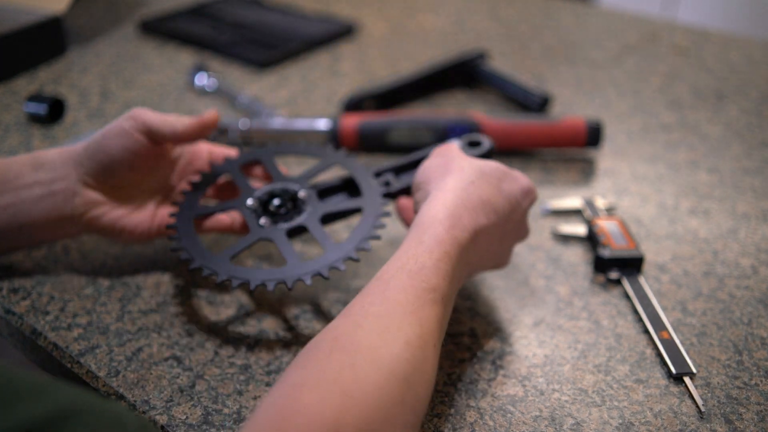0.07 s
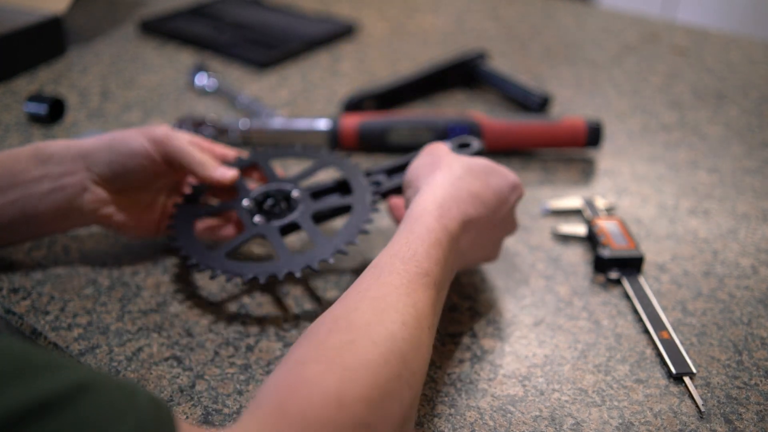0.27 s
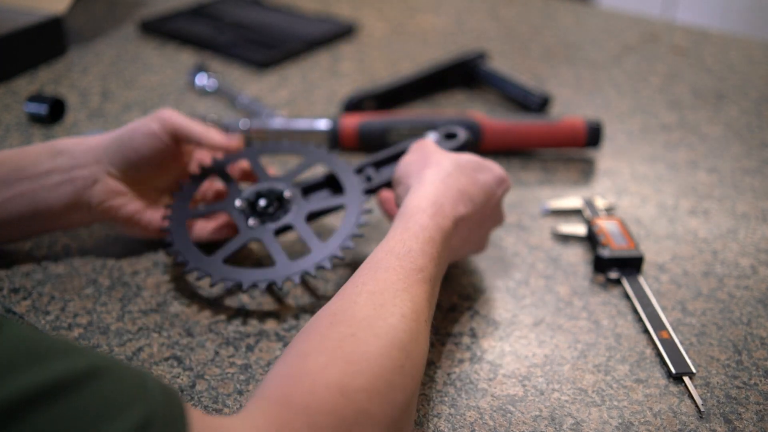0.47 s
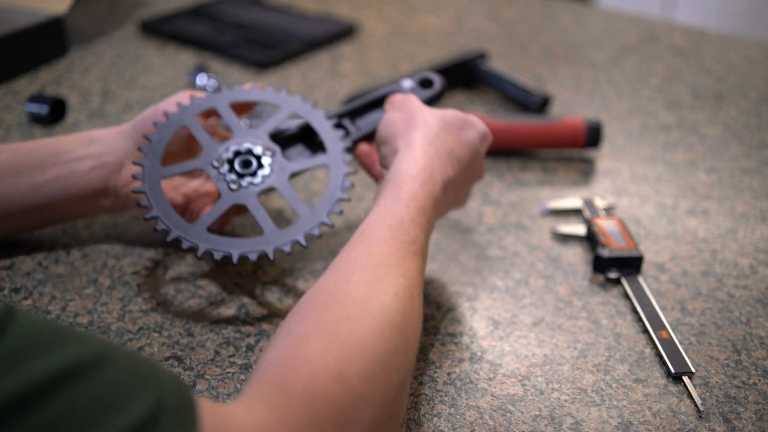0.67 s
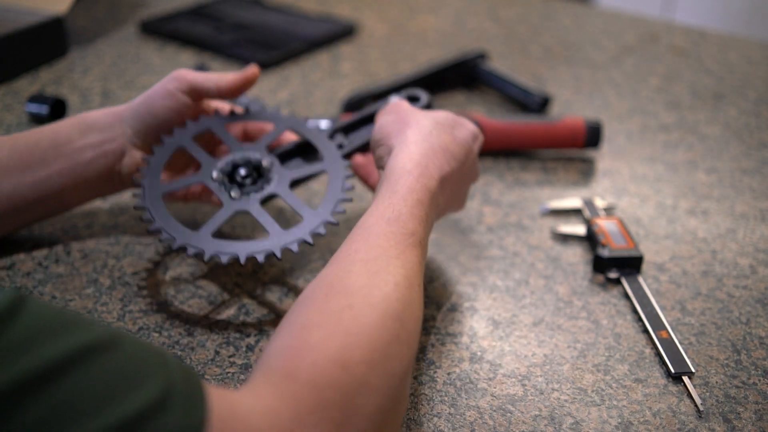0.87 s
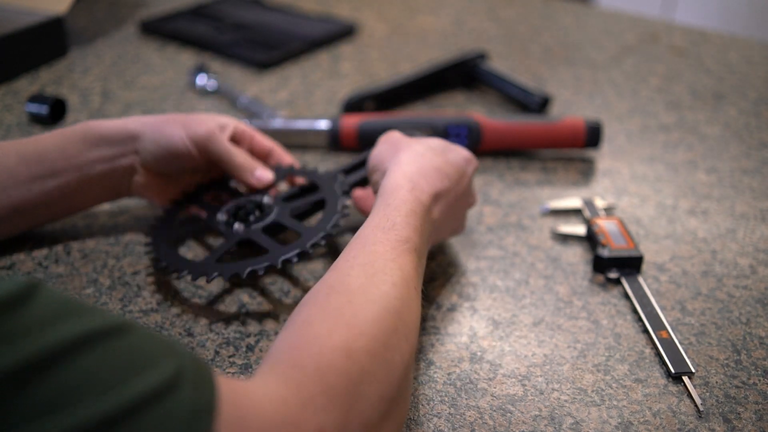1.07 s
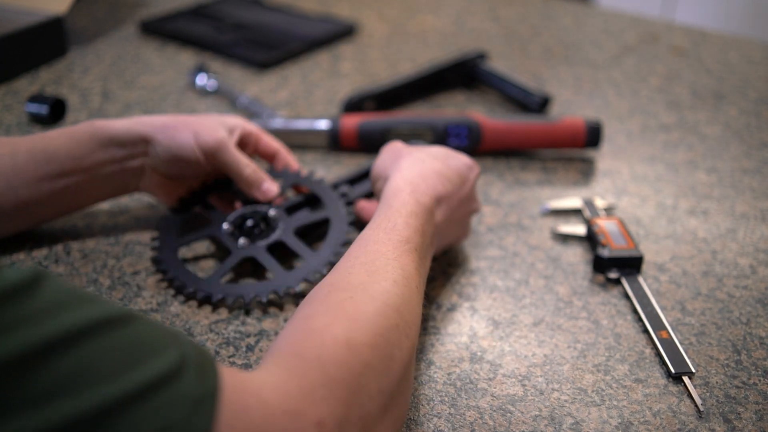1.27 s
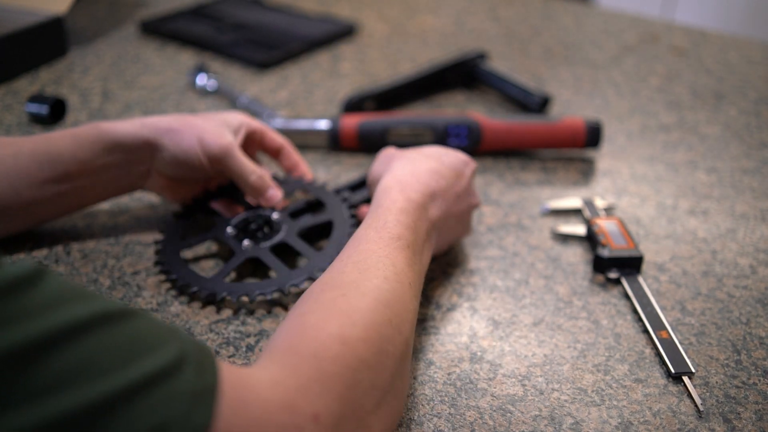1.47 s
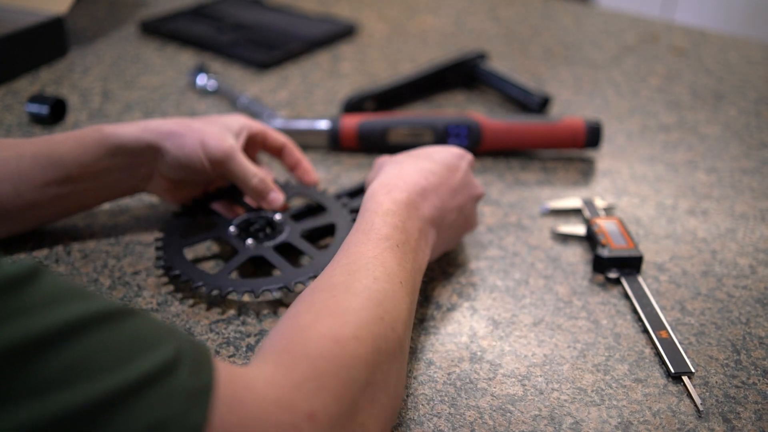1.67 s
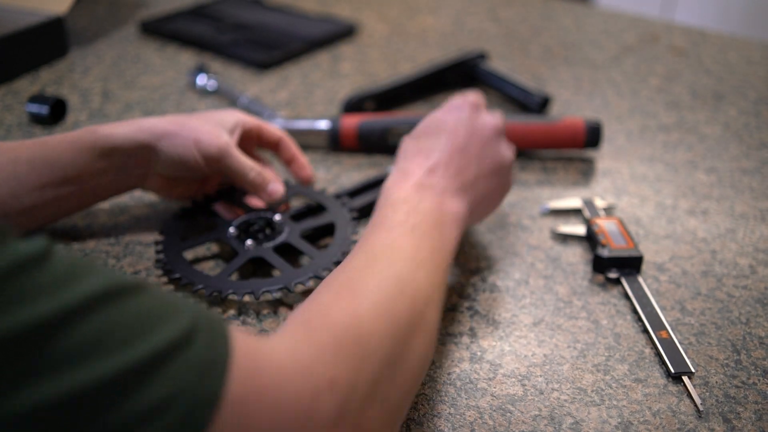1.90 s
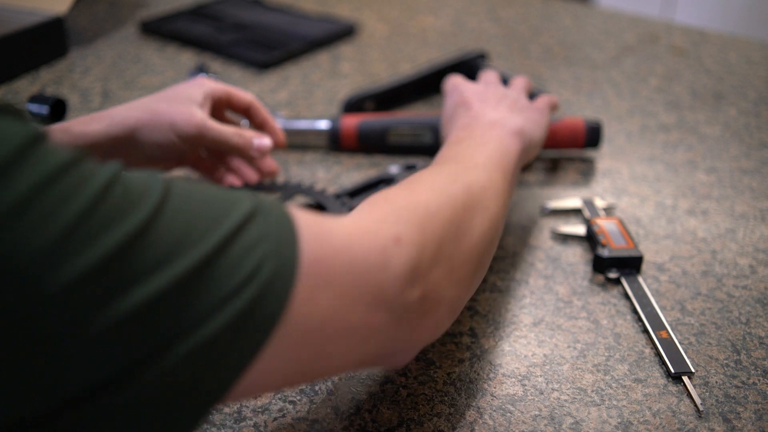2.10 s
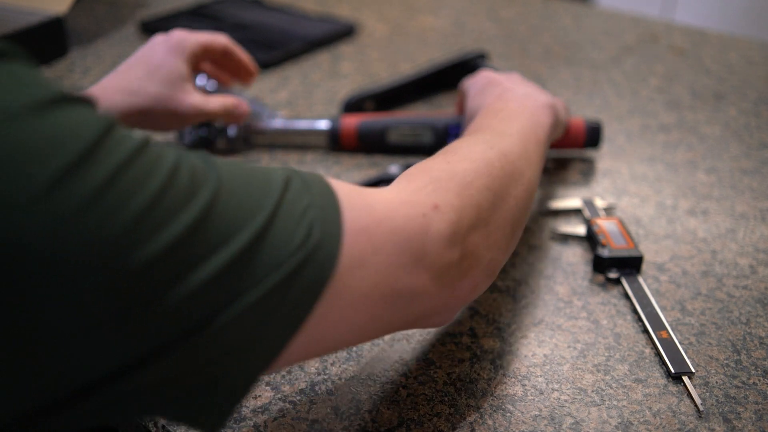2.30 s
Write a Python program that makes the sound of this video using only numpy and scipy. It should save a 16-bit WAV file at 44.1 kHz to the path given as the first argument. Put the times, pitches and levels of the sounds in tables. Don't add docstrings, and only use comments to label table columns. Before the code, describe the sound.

Light metallic ticks of handled bike parts come first, then a ringing clank and a harder double clack as they meet a stone counter, ending in soft rustling; small live room, faint hush, close small recorder.

```python
import sys
import numpy as np
from scipy import signal
from scipy.fft import rfft, irfft
from scipy.io import wavfile
from scipy.ndimage import uniform_filter1d, map_coordinates

SR = 44100
rng = np.random.default_rng(int(sys.argv[2]) if len(sys.argv) > 2 else 0)


def voltage_ratio(decibels):
    exponent = np.asarray(decibels, float) / 20
    return 10 ** exponent


def generate_wav(sig):
    pcm = np.round(np.clip(np.atleast_2d(sig).T, -1, 1) * 32767).astype(np.int16)
    wavfile.write(sys.argv[1], SR, pcm)


N = 103414
LEAD_S = 0.5


def unit(x):
    return x / np.sqrt(np.mean(x ** 2) + 1e-20)


def along(points, hz):
    f, v = np.transpose(points)
    return np.interp(np.log(hz + 1), np.log(f + 1), v)


def colour(gain_db):
    floored_db = np.maximum(gain_db(np.fft.rfftfreq(2048, 1 / SR)), -90)
    cepstrum = irfft(np.log(voltage_ratio(floored_db)))
    cepstrum[1:1024] *= 2
    cepstrum[1025:] = 0
    h = irfft(np.exp(rfft(cepstrum)))[:1024]
    return h / np.linalg.norm(h)


def chatter(lengths_s):
    contacts_per_s, spread_db, longest_fade_s = 7000, 3, 0.0055
    t = np.arange(SR // 8) / SR
    length = lengths_s[:, None]
    shape = (len(lengths_s), len(t))
    hit = rng.random(shape) < contacts_per_s / SR
    hit[:, 0] = True
    size = rng.choice([-1, 1], shape) * voltage_ratio(spread_db * rng.standard_normal(shape))
    fade = np.exp(-np.maximum(t - length, 0) / np.minimum(longest_fade_s, length))
    fade = fade * (1 - 0.27 * np.exp(-t / (0.75 * length)))
    scale = np.sqrt(np.mean(((hit + 0.28) * size) ** 2))
    return (hit + 0.11) * size * fade / scale


def add(track, s, x):
    i = round((s + LEAD_S) * SR)
    track[:, i:i + x.shape[1]] += x


def high_pass(x, hz, order):
    return signal.sosfilt(signal.butter(order, hz, "high", fs=SR, output="sos"), x)


def answer(x, wet_db, spread_db=0):
    # (frequency [Hz], t60 [s])
    room = [(150, 0.69), (350, 0.48), (700, 0.46), (2000, 0.36), (6000, 0.34), (11000, 0.31)]
    delay_s, scatter_t60_s = 0.0027, 0.0014
    hz, t, z = signal.stft(rng.standard_normal((2, SR * 3 // 5)), SR, nperseg=256)
    decay = voltage_ratio(-60 * t / along(room, hz)[:, None])
    tail = signal.istft(z * decay, SR, nperseg=256)[1]
    tail = voltage_ratio(wet_db) * tail / np.linalg.norm(tail[0])
    tail = np.pad(tail, ((0, 0), (round(delay_s * SR), 0)))
    tail[0, 0] = 1
    early = np.arange(SR // 50) / SR
    scatter = rng.standard_normal(len(early)) * voltage_ratio(-60 * early / scatter_t60_s)
    tail[1, :len(scatter)] += voltage_ratio(spread_db) * scatter / np.linalg.norm(scatter)
    return signal.fftconvolve(x[None], tail, axes=1)


def clinks():
    # (time [s], level [dB], chatter [s], brightness [dB per octave], plate ring [dB])
    contacts = [(-.03, -38.5, 0.018, -5.5, 0), (0.152, -56.5, 0.0021, -21, 1.5),
                (0.4034, -36, 0.016, -12.5, 8.5), (.409, -25.5, 0.0075, 5, 0),
                (.422, -23, 0.0082, 4.5, -1.5), (.437, -40, .006, 11, 0), (0.645, -35, 0.0088, -10.5, -8),
                (0.725, -50, 0.0021, -2, -8), (1.109, -37, 0.015, -13.5, -14),
                (1.139, -42, 0.0047, -5, -18), (1.351, -41, 0.0022, -7, -12), (1.3554, -20.5, 0.011, 6, -1),
                (1.365, -26, 0.0018, -4, -10), (1.391, -16.5, 0.003, -3, -1),
                (1.453, -27.5, 0.0067, -3.5, -3), (1.6338, -30, 0.0023, -1.5, -17),
                (1.64, -38, 0.0045, -1, -11), (1.6884, -15, 0.0082, 3, 0), (1.698, -16.5, 0.0035, 8.5, -4),
                (1.7326, -14, 0.012, 6, -2), (2.0057, -38, 0.0084, -2.5, -3),
                (2.1435, -34.5, 0.0012, -8, -20)]
    plate_hz = [1505, 2350, 3210, 3945, 3990, 4580, 5160, 5980, 6670, 7670, 8050, 8385, 9190, 9660]
    # (level [dB], t60 [s])
    plate = [(-12, .045), (-7, .02), (-9, .03), (-8, .045), (-7, .045), (-11, .04), (-15, .03), (5, .025),
             (4, .025), (0, .03), (-7, .04), (-6, .045), (-7, .045), (-9, .04)]
    # (frequency [Hz], density [dB per Hz])
    clatter = [(470, -44), (800, -64.5), (1490, -8), (4030, -7), (4870, -6), (6020, -5.5), (9950, -20),
               (11500, -14), (15000, -61.5), (22000, -120)]
    longest_t60_s = 0.045
    track, t = np.zeros((2, N + 3 * SR)), np.arange(SR // 4) / SR
    luck = rng.standard_normal((len(contacts), len(plate)))
    forces = chatter(np.array(contacts)[:, 2])
    for (s, db, _, tilt_db, ring_db), force, row in zip(contacts, forces, luck):
        ring = np.zeros(len(t))
        for hz, (level, t60), r in zip(plate_hz, plate, row):
            mode_db = level + 2 * r + tilt_db * np.log2(hz / 4000)
            decay_db = -60 * t / min(t60, longest_t60_s)
            ring += voltage_ratio(mode_db + decay_db) * np.sin(2 * np.pi * hz * t)
        body = voltage_ratio(ring_db - 29.5) * ring
        body[:1024] += voltage_ratio(-4.5) * colour(
            lambda f: along(clatter, np.maximum(f, 1500)) + tilt_db * np.log2(f / 4000 + 0.27))
        clink = high_pass(signal.fftconvolve(force, body), 1487, order=6)
        add(track, s, answer(voltage_ratio(db) * clink, wet_db=-6.5))
    return track


def noise(spectrum):
    # (frequency [Hz], coherence [0 to 1])
    alike = [(60, 1), (350, 0.74), (2030, 0.044), (11800, 0.19)]
    f = np.fft.rfftfreq(N, 1 / SR)
    turn = np.arccos(np.clip(along(alike, f), -1, 1)) / 2
    shaped = rfft(rng.standard_normal((2, N))) * voltage_ratio(along(spectrum, f))
    mid, side = irfft(shaped * [np.cos(turn), np.sin(turn)], N)
    return unit(np.array([mid + side, mid - side]))


def background():
    # (frequency [Hz], density [dB per Hz])
    hush = [(18, -66), (30, -29.5), (371, -3.5), (1290, -5.5), (2010, -5), (2170, -9.5), (2710, -7.5),
            (10700, -10), (11500, -18), (15000, -67), (22000, -120)]
    # (frequency [Hz], density [dB per Hz])
    rustle = [(150, -14.5), (400, 0), (800, 6.5), (1400, 5.5), (3000, 0), (8000, -8)]
    # (time [s], level [dB])
    rustle_level = [
        (0, -56),
        (.2, -55.5),
        (.45, -54.5),
        (.6, -77),
        (2.0, -53),
        (2.34, -64),
    ]
    hush_db, left_db = -58, -0.13
    t = np.arange(N) / SR
    level_db = np.interp(t, *np.transpose(rustle_level))
    level_db = level_db + 1.5 * map_coordinates(rng.standard_normal(100), [t * 40])
    both = voltage_ratio(hush_db) * noise(hush) + voltage_ratio(level_db) * noise(rustle)
    return both * voltage_ratio([[left_db], [-left_db]])


def flutter_db(depth_db):
    return depth_db * map_coordinates(rng.standard_normal(64), [np.arange(SR) * 35 / SR])


def notes():
    struck_s = [
        0.406,
        0.729,
        1.356,
        1.505,
        1.734,
        2.009,
    ]
    swell_s = [.02, .002, .008, .008, .015, .004]
    flutter_depth_db = [2.5, 1, 1.2, 1, 4, 3]
    held_hz = [1306, 2160, 2266, 3381, 3941, 3981, 4581, 6060, 5990, 6686, 7660, 8387, 9170]
    ticked_hz = [3985]
    laid_hz = [2266, 3379, 3951, 4850, 5148, 5185, 6611, 6688, 7720, 8344, 9146, 10175]
    blip_hz = [5350]
    settled_hz = [3948, 3985, 5146, 6654, 8382, 9179]
    nudged_hz = [3942, 3984]
    # (level [dB], t60 [s], damped at [s])
    held = [(-69, 4.3, 1.2), (-73, 9, 1.1), (-72, 2, .9), (-55, 1.8, .68), (-62, 1.3, .66), (-65, 1.5, .68),
            (-58, .3, .6), (-52, .5, .8), (-47, .3, .8), (-46, .2, .6), (-52, .25, .6), (-46, .25, .6),
            (-52, .35, .7)]
    ticked = [(-53, .1, .75)]
    laid = [(-27, .65, 1.54), (-31, 1.6, 1.55), (-42, .5, 1.6), (-36, .25, 1.55), (-31, .25, 1.6),
            (-37, .25, 1.6), (-25, .55, 1.49), (-30, .15, 1.5), (-44, .3, 1.6), (-36, .2, 1.5),
            (-46, .36, 1.6), (-40, .25, 1.6)]
    blip = [(-40, 0.066, 1.54)]
    settled = [(-40, .7, 1.88), (-44, .7, 1.9), (-33, .14, 1.8), (-44, .3, 2), (-42, .3, 2),
               (-42, .42, 1.9)]
    nudged = [(-54, .45, 2.13), (-56, .4, 2.13)]
    damped_t60_s = 0.24
    track, t = np.zeros((2, N + 3 * SR)), np.arange(SR) / SR
    pitches = [held_hz, ticked_hz, laid_hz, blip_hz, settled_hz, nudged_hz]
    tables = [held, ticked, laid, blip, settled, nudged]
    for start, swell, depth_db, tones, table in zip(struck_s, swell_s, flutter_depth_db, pitches, tables):
        chord = np.zeros(len(t))
        for hz, (db, t60, damped) in zip(tones, table):
            free_db = db + 2 - 60 * t / t60
            touch_db = -60 * np.maximum(t + start - damped, 0) / damped_t60_s
            chord += voltage_ratio(free_db + touch_db + flutter_db(depth_db)) * np.sin(2 * np.pi * hz * t)
        swelled = chord * (1 - np.exp(-t / swell))
        add(track, start, answer(swelled, wet_db=-13, spread_db=-9))
    return track


def knocks():
    # (time [s], level [dB], chatter [s], brightness [dB per octave])
    blows = [(1.356, -21, 0.016, 0), (1.40, -35, 0.027, -1), (1.462, -37, 0.0039, 1),
             (1.636, -40, 0.0048, -6.5), (1.662, -43.5, 0.0035, -10), (1.6848, -8.5, 0.00087, -1.5),
             (1.691, -23.5, 0.033, -2.5), (1.728, -31.5, 0.0052, -1), (1.76, -31.5, 0.054, 2),
             (2.009, -47.5, 0.024, -11.5), (2.038, -57, 0.02, -9.5), (2.145, -52, 0.0079, 0.5),
             (2.228, -66, 0.0063, -9)]
    # (frequency [Hz], density [dB per Hz])
    stone = [(60, -27.5), (150, -24.5), (250, -7.5), (400, -3), (700, 3.5), (1700, -2.5), (3000, -9),
             (6000, -19)]
    stone_t60_s = 0.024
    track, t = np.zeros((2, N + 3 * SR)), np.arange(SR // 10) / SR
    tails = rng.standard_normal((len(blows), len(t))) * voltage_ratio(-24 - 60 * t / stone_t60_s)
    tails[:, 0] = 1
    forces = chatter(np.array(blows)[:, 2])
    for (s, db, _, tilt_db), force, tail in zip(blows, forces, tails):
        tone = colour(lambda f: along(stone, f) + tilt_db * np.log2(np.maximum(f, 300) / 500))
        body = signal.fftconvolve(tail / np.linalg.norm(tail), tone)
        add(track, s, answer(voltage_ratio(db) * signal.fftconvolve(force, body), wet_db=-1.5))
    return track


def scene():
    # (frequency [Hz], level [dB])
    width = [(200, -28), (700, -9), (1500, -3.5), (4000, -4), (9000, -1)]
    left_db = 0.45
    first = round(LEAD_S * SR)
    mid, side = (clinks() + notes() + knocks())[:, first:first + N]
    side = irfft(rfft(side) * voltage_ratio(along(width, np.fft.rfftfreq(N, 1 / SR))), N)
    parts = np.array([mid + side, mid - side]) * voltage_ratio([[left_db + 5.5], [8.5 - left_db]])
    return parts + background()


def low_pass(x):
    return signal.sosfilt(signal.butter(12, 12400, fs=SR, output="sos"), x)


def record(dry):
    knee_db, squeeze, follow_s = -29, 0.47, 0.029
    top_hz, edge_hz, roll_db_per_khz = 10940, 300, 38
    ceiling = 0.75
    keep = np.exp(-1 / (follow_s * SR))
    power = signal.lfilter([1 - keep], [1, -keep], np.mean(dry ** 2, axis=0))
    over_db = np.maximum(10 * np.log10(power + 1e-12) - knee_db, 0)
    cut_db = uniform_filter1d(squeeze * over_db, size=200)
    x = high_pass(dry * voltage_ratio(-cut_db), 104, order=2)
    above_hz = np.fft.rfftfreq(N, 1 / SR) - top_hz
    roll_db = np.clip(above_hz / edge_hz, 0, 1) * (21 + roll_db_per_khz * above_hz / 1000)
    x = irfft(rfft(x) * voltage_ratio(-roll_db), N)
    x = x / (1 + np.abs(x / ceiling) ** 4) ** (1 / 4)
    return low_pass(x)


dry = scene()
out = record(dry)
generate_wav(out)
```